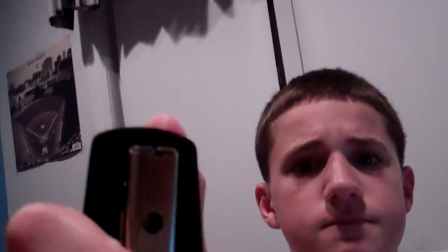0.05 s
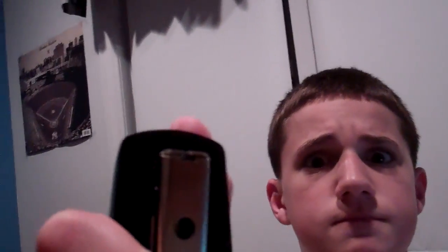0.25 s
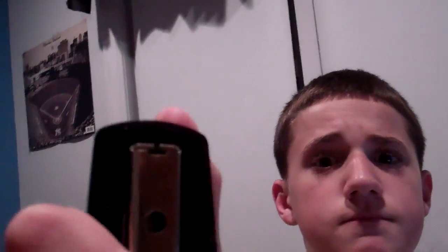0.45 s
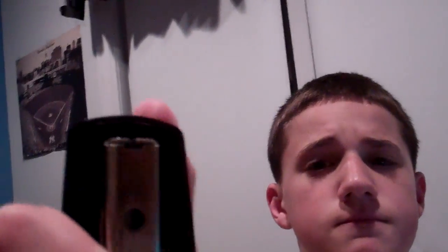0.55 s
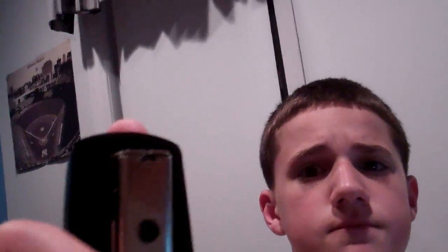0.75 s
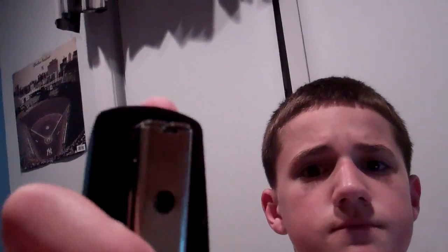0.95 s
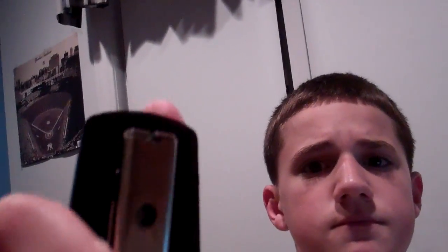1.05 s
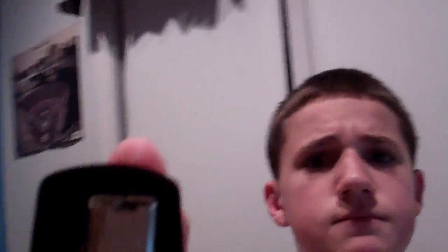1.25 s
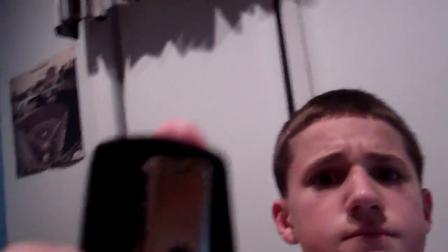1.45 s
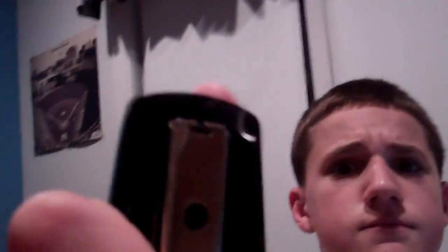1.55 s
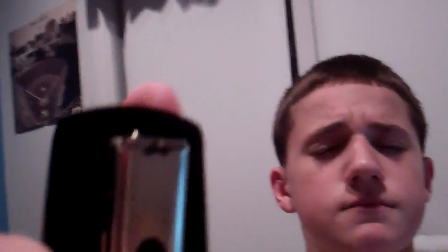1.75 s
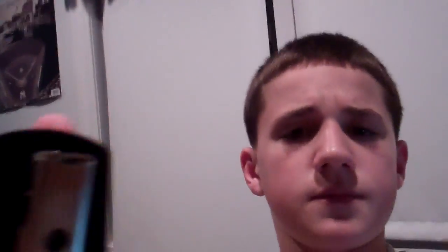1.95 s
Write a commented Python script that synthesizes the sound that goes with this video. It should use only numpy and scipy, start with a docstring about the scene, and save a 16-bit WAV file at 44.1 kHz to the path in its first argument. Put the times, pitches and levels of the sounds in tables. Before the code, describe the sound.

Close, slightly overloaded stapler crunches, one near half a second and one past a second and a half, each with metallic rattle, a low thump and short room ring; lighter clicks fall between over soft hiss.

```python
"""Over a soft bed of hum, room noise and hiss, a handheld stapler close to the microphone in a small room
snaps shut twice, with light clicks before, between and after. Snaps and clicks are short noise bursts
coloured by the modes of shell and rail, with a sine ring added to each light click. Each snap also rattles,
thumps and sets the room ringing. Gain control ducks all but the hiss, and loud peaks overload."""
import sys
import numpy as np
from scipy import signal
from scipy.fft import rfft, irfft
from scipy.io import wavfile
from scipy.ndimage import uniform_filter1d

SR = 44100
rng = np.random.default_rng(int(sys.argv[2]) if len(sys.argv) > 2 else 0)


def wav_out(sig):
    """Save sig, one row per channel (or a flat mono array), as 16-bit PCM at SR to the path in sys.argv[1]."""
    wavfile.write(sys.argv[1], SR, np.round(np.clip(np.atleast_2d(sig).T, -1, 1) * 32767).astype(np.int16))


N = 88288
TIME = np.arange(N) / SR   # [s]

# hiss: (time [s], level of mid and of side [dB])
HISS_LEVEL = [(0, -60.5), (.45, -57), (.9, -58.5), (1.55, -57.5), (1.85, -60.5), (2, -68)]
# colour of the steady room noise: (frequency [Hz], relative density [dB])
ROOM_TONE_COLOUR = [(30, -9), (80, -9), (125, -4), (200, -5), (330, -4), (650, -2.5), (1100, -7),
                    (2000, -15.5), (14000, -26)]
# partials of the hum: (frequency [Hz], RMS level [dB])
HUM_PARTIALS = [(121.3, -65), (300, -74.5), (483, -75), (606, -73)]
# the room's answer: (frequency [Hz], density of early part and tail together [dB], tail t60 [s],
# side under mid [dB])
ROOM_BANDS = [(150, -39.5, .18, -11.5), (385, -37.5, 0.14, -14), (780, -12.5, 0.28, -16.5),
              (1150, -17.5, 0.61, -7.5), (1576, -18, 0.61, -4.5), (2200, -18, 0.28, -8),
              (4000, -19.5, 0.29, -2), (6000, -16.5, .25, -3), (9160, -18, 0.29, -2),
              (14000, -15.5, 0.26, -1)]
# modes of the shell and the steel rail: (frequency [Hz], peak gain [dB], t60 [s])
BODY_MODES = [(842, -1, 0.028), (1578, 2.5, 0.014), (2040, -6, 0.003), (3500, -19, 0.011),
              (3996, -2, 0.0023), (8480, -7.5, 0.0026), (8500, -6, .12), (11480, -12, 0.16),
              (12500, -8, 0.0057), (15000, -19, 0.11)]
# edges of the knock, clack, click and sizzle ranges: (frequency [Hz])
RANGE_EDGES_HZ = [260, 1200, 2800, 5800, 15000]
# stereo placing, one entry per range: (left over right [dB])
RANGE_PAN_DB = [2.5, 3.5, 1.5, -.3]
# stereo width, one entry per range: (side against mid [dB])
RANGE_SIDE_DB = [-15.5, -5.5, -5, -6]
# light contacts of arm, spring and rail: (time [s], t60 of the click range [s], main resonance [Hz],
# its level [dB], knock [dB], clack [dB], click [dB], sizzle [dB])
LIGHT_CLICKS = [ (0.0211, 0.012, 3880, -6.5, -11, -8, 4.5, 4.5),
                (0.0271, 0.0074, 4230, 1, -16.5, -6, -12, 9),
                (0.0956, 0.015, 1420, -26, -23.5, -37, -38, -45),
                (0.449, 0.022, 4100, -32, -43, -36.5, -47, -19.5),
                (0.4624, 0.024, 3750, -23, -28.5, -17.5, -3, -3),
                (0.595, 0.012, 1500, -16, -20, -17, -3, 3), (0.6886, .02, 2000, -17, -42, -21, -24, -8),
                (.6915, 0.012, 2080, 11, -7, 4.5, -3, 9.5), (0.6919, 0.0077, 4000, 5.5, -25.5, 0, 4, 0),
                (0.7101, 0.019, 1575, -13, -14.5, -24, -5.5, 5),
                (.7600, 0.048, 980, -16.5, -23, -19.5, -18, -13.5),
                (0.8291, 0.013, 3230, -3, -10, -7, -6, 3.5),
                (1.0225, .04, 1530, -25, -27.5, -23, -23.5, -28),
                (1.0415, 0.0084, 3330, -7, -25, -22.5, -7, -10),
                (1.0629, 0.088, 3960, -14, -28, -15, -15, -1.5),
                (1.0706, 0.011, 774, -6.5, -9.5, -1, 7, 10.5),
                (1.0758, 0.0049, 4130, 2.5, -6.5, -9, 1.5, 6),
                (1.1220, 0.012, 1340, -18.5, -18.5, -26, -54, -50),
                (1.4010, 0.0072, 5420, -39, -49, -50, -35, -31),
                (1.7275, .011, 6300, -6, -20, -7.5, -5.5, 4.5), (1.7684, 0.032, 1950, 6, -10.5, 3, 6.5, 17),
                (1.7707, 0.014, 3990, 11, -11, 11.5, 17, 9.5), (1.7853, 0.018, 485, -5.5, -4, -6, -1, 15.5),
                (1.9114, 0.0066, 7490, -37.5, -42.5, -27, -48, -14),
                (1.9145, 0.036, 1380, -17.5, -28, -26, -31, -21.5)]
# the stapler snaps shut: (time [s], level [dB], thump before its low cut [dB])
SNAPS = [(0.4654, 24, 2.5), (1.6006, 23.5, -1)]
# balance of a snap, one entry per range: (level [dB])
SNAP_COLOUR_DB = [-4, -2.5, -2.5, 6.5]
# balance of the rattle, one entry per range: (level [dB])
RATTLE_COLOUR_DB = [-19, -9.5, -5, 2]

ROOM_TONE_DB, ROOM_TONE_SIDE_DB = -60, -8
ROOM_DELAY_S, EARLY_DB, EARLY_T60_S = 0.0038, 1.5, 0.074   # early level is over the tail
THUMP_AFTER_S, THUMP_WIDTH_S, THUMP_LOW_HZ, THUMP_PAN_DB = 0.0052, 0.0018, 30, -5.5
RIGHT_LEADS_S = 0.000012   # between the two microphone ports
CONTACT_RISE_S = 0.000089
BASS_RINGS_LONGER, RATTLE_BASS_LONGER = 0.062, 0.07   # exponents of ring time over pitch
RESONANCE_LASTS = 0.75   # share of the click's ring time
SNAP_RING_S, RATTLE_T60_S = 0.013, 0.22   # t60 of the click range
CRUNCH_AFTER_S, STOP_AFTER_S = 0.0024, 0.0052
CRUNCH_DB, STOP_DB, RATTLE_DB = -0.5, -7, -1   # against the snap
DUCK_ABOVE_DB, DUCK_SHARE, DUCK_MAX_DB = -13.5, 1, 12
DUCK_ATTACK_S, RECOVER_DB_PER_S = 0.0076, 16
OVERLOAD_TOP, CUTOFF_HZ = 0.81, 14400


def from_db(db):
    """Turn decibels into an amplitude factor."""
    return 10 ** (np.asarray(db) / 20)


def pan(db):
    """Gains that put the left channel this far over the right."""
    return from_db([[db / 2], [-db / 2]])


def decay(t, t60):
    """Exponential decay by 60 dB over t60."""
    return np.exp(-np.log(1000) * t / t60)


def unit_energy(x):
    """Scale stereo sound so that its mean energy per channel is one."""
    return x / np.sqrt(np.sum(x ** 2) / 2 + 1e-20)


def band(x, low_hz, high_hz, order):
    """Keep one range of frequencies."""
    edges = [low_hz, min(high_hz, 0.47 * SR)]
    return signal.sosfilt(signal.butter(order, edges, "band", fs=SR, output="sos"), x)


def stereo_noise(side_db, size):
    """White noise; the lower the side, the more alike the channels."""
    mid, side = rng.standard_normal((2, size))
    return mid + from_db(side_db) * side * np.array([[1], [-1]])


def add(out, s, sound):
    """Mix a sound in at s seconds."""
    start = int(s * SR)
    out[:, start:start + sound.shape[1]] += sound[:, :N - start]


def hiss():
    """Wide white hiss that swells and sinks slightly, then fades near the end."""
    return stereo_noise(side_db=0.0, size=N) * from_db(np.interp(TIME, *np.transpose(HISS_LEVEL)))


def room_tone():
    """Soft steady room noise: white noise shaped in the spectrum."""
    hz, db = np.transpose(ROOM_TONE_COLOUR)
    bin_hz = np.fft.rfftfreq(N, 1 / SR)
    colour = from_db(np.interp(np.log(bin_hz + 1), np.log(hz), db))
    spectrum = rfft(stereo_noise(ROOM_TONE_SIDE_DB, size=N)) * colour
    air = unit_energy(irfft(spectrum, N)) * np.sqrt(N)   # RMS of one
    return from_db(ROOM_TONE_DB) * air


def hum():
    """Mains hum: steady sine partials, each starting at a random phase."""
    out = np.zeros(N)
    for hz, db in HUM_PARTIALS:
        out += np.sqrt(2) * from_db(db) * np.sin(2 * np.pi * (hz * TIME + rng.random()))
    return out


def room(x):
    """Dense early reflections and a noise tail that dies band by band."""
    t, response = TIME[:SR // 2], 0
    hz, *columns = np.transpose(ROOM_BANDS)
    edges = np.geomspace(110, 16000, 21)
    for low, high in zip(edges, edges[1:]):
        log_centre = np.log(low * high) / 2
        db, t60, side_db = (np.interp(log_centre, np.log(hz), column) for column in columns)
        dying = decay(t, t60) + from_db(EARLY_DB) * decay(t, EARLY_T60_S)
        reflections = stereo_noise(side_db, size=len(t)) * dying * (t > ROOM_DELAY_S)
        answer = unit_energy(band(reflections, low, high, order=3))
        band_share = np.sqrt(2 * (high - low) / SR)   # wider bands carry more energy
        response = response + from_db(db) * band_share * answer
    mono = x.mean(axis=0)[None]
    return signal.fftconvolve(mono, response, axes=1)[:, :N]


def thumps():
    """A smooth low thump with each snap: a bell-shaped pulse with its lowest part cut."""
    pulses = np.zeros(N)
    for s, _, db in SNAPS:
        pulses += from_db(db) * np.exp(-((TIME - s - THUMP_AFTER_S) / THUMP_WIDTH_S) ** 2)
    low_cut = signal.butter(1, THUMP_LOW_HZ, "high", fs=SR, output="sos")
    return signal.sosfilt(low_cut, pulses + 1e-18) * pan(THUMP_PAN_DB)


def at_ports(x):
    """The sound reaches the left port a moment after the right."""
    delay = np.exp(-2j * np.pi * np.fft.rfftfreq(N, 1 / SR) * RIGHT_LEADS_S)
    return np.array([irfft(rfft(x[0]) * delay, N), x[1]])


def body(x):
    """The contacts excite the two-pole modes of shell and rail, added to the bare sound."""
    out = x.copy()
    for hz, db, t60 in BODY_MODES:
        radius, angle = decay(1 / SR, t60), 2 * np.pi * hz / SR
        poles = [1, -2 * radius * np.cos(angle), radius * radius]
        ringing = signal.lfilter([1, 0, -1], poles, x + 1e-18)
        out += from_db(db) * (1 - radius * radius) / 2 * ringing
    return out


def strike(t, t60):
    """Envelope of a contact: a very quick rise, then an even decay."""
    return (1 - np.exp(-t / CONTACT_RISE_S)) * decay(t, t60) + 1e-12


def contact(ring_s, colour_db, longer=BASS_RINGS_LONGER):
    """A hard contact: noise bursts in four ranges, the low ones lasting longer."""
    t, out = TIME[:SR // 3], 0
    ranges = zip(RANGE_EDGES_HZ, RANGE_EDGES_HZ[1:], colour_db, RANGE_PAN_DB, RANGE_SIDE_DB)
    for low, high, db, pan_db, side_db in ranges:
        t60 = ring_s * (RANGE_EDGES_HZ[-2] / high) ** longer
        burst = stereo_noise(side_db, size=len(t)) * strike(t, t60)
        out = out + from_db(db) * pan(pan_db) * unit_energy(band(burst, low, high, order=3))
    return out


def resonance(hz, t60):
    """The one mode that a light contact favours: the slope of a dying sine."""
    t = TIME[:SR // 5]
    ring = np.gradient(np.sin(2 * np.pi * hz * t) * strike(t, t60))
    pan_db = np.interp(hz, RANGE_EDGES_HZ[1:], RANGE_PAN_DB)
    return unit_energy(ring * pan(pan_db))


def add_snap(out, s, db):
    """Break-through, crunch of the bending staple, stop on the anvil, then spring and staples shiver."""
    for after_s, part_db in [(0, 0), (CRUNCH_AFTER_S, CRUNCH_DB), (STOP_AFTER_S, STOP_DB)]:
        add(out, s + after_s, from_db(db + part_db) * contact(SNAP_RING_S, SNAP_COLOUR_DB))
    rattle = contact(RATTLE_T60_S, RATTLE_COLOUR_DB, longer=RATTLE_BASS_LONGER)
    add(out, s + STOP_AFTER_S, from_db(db + RATTLE_DB) * rattle)


def stapler():
    """Snaps and single light clicks, all coloured by the metal body."""
    out = np.zeros((2, N))
    for s, db, _ in SNAPS:
        add_snap(out, s, db)
    for s, ring_s, hz, db, *colour_db in LIGHT_CLICKS:
        add(out, s, from_db(db) * resonance(hz, RESONANCE_LASTS * ring_s))
        add(out, s, contact(ring_s, colour_db))
    return body(out)


def scene():
    """Stapler, the room's answer, thumps, room noise and hum."""
    direct = stapler()
    return at_ports(direct) + room(direct) + thumps() + room_tone() + hum()


def record(dry):
    """Gain control ducks loud sounds and recovers slowly; peaks overload, hiss joins, the top is cut."""
    power = np.abs(uniform_filter1d(np.mean(dry ** 2, axis=0), size=128))
    level_db = 10 * np.log10(power + 1e-12)
    wanted_db = np.clip(DUCK_SHARE * (level_db - DUCK_ABOVE_DB), 0, DUCK_MAX_DB)
    recovery_db = RECOVER_DB_PER_S * TIME
    held_db = np.maximum.accumulate(wanted_db + recovery_db) - recovery_db
    smoothing = np.exp(-1 / (DUCK_ATTACK_S * SR))
    duck_db = signal.lfilter([1 - smoothing], [1, -smoothing], held_db)
    ducked = dry * from_db(-duck_db)
    clipped = OVERLOAD_TOP * np.tanh(ducked / OVERLOAD_TOP)
    top_cut = signal.ellip(10, 0.2, 60, CUTOFF_HZ, fs=SR, output="sos")
    return signal.sosfilt(top_cut, clipped + hiss())


dry = scene()
out = record(dry)
wav_out(out)
```